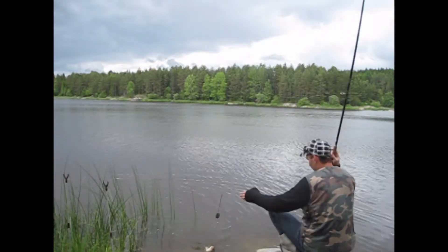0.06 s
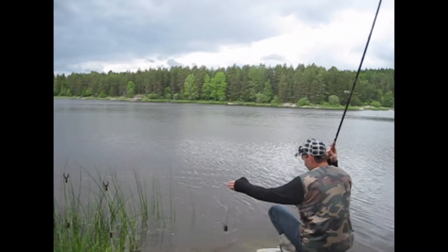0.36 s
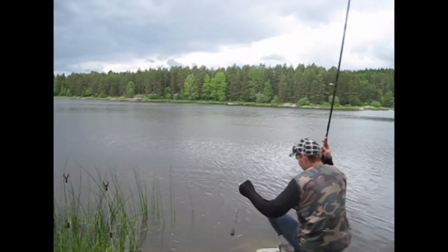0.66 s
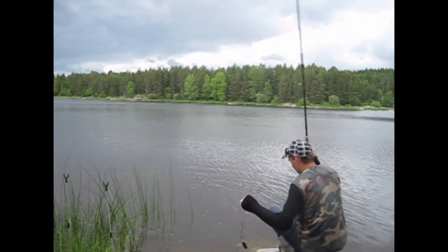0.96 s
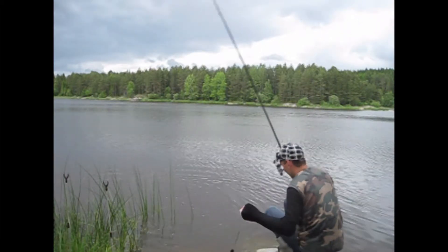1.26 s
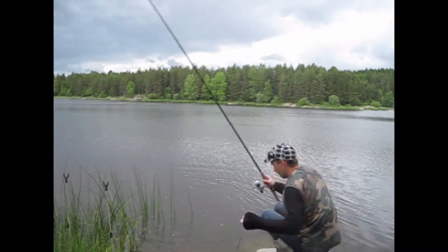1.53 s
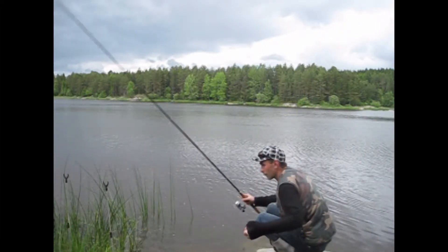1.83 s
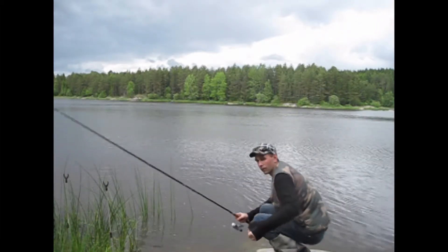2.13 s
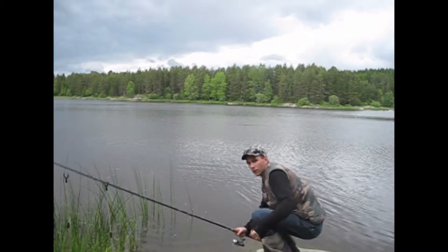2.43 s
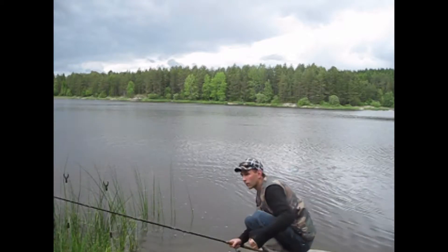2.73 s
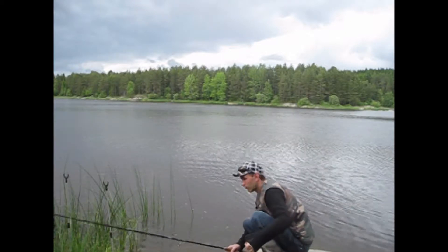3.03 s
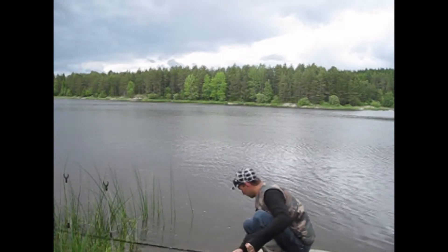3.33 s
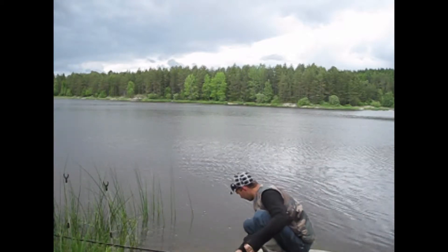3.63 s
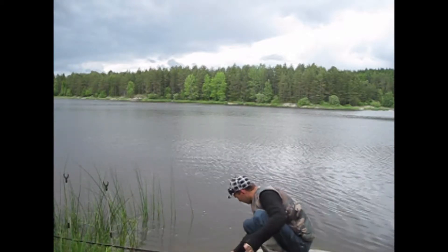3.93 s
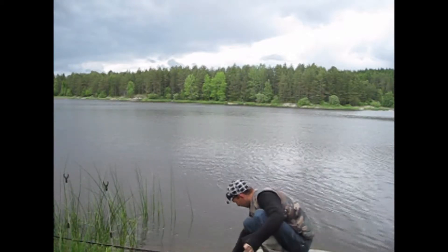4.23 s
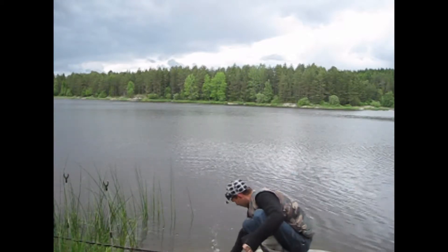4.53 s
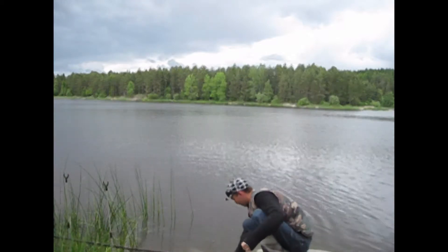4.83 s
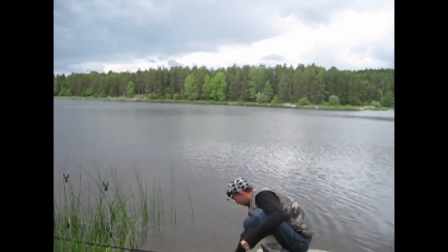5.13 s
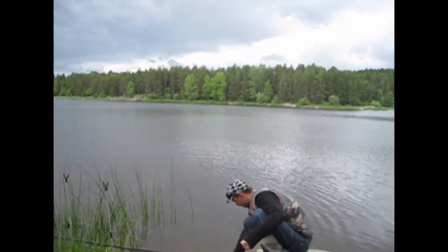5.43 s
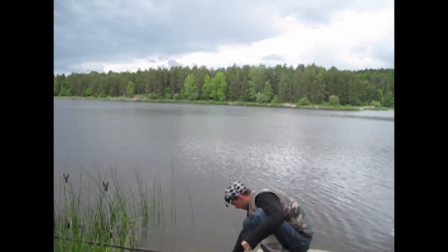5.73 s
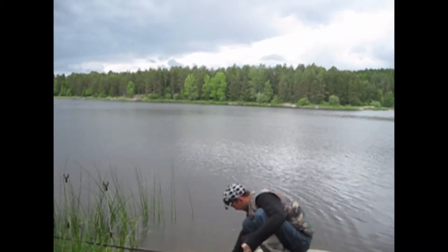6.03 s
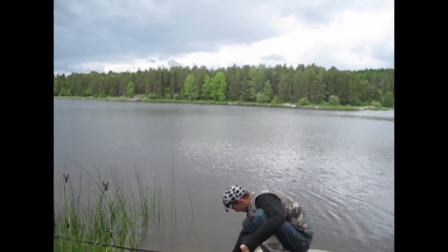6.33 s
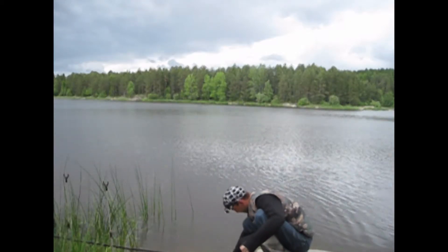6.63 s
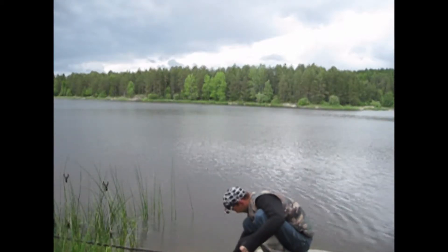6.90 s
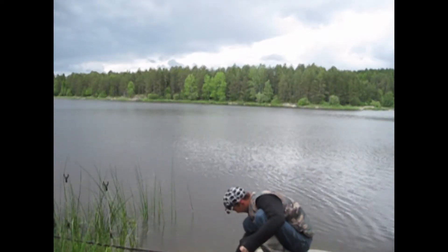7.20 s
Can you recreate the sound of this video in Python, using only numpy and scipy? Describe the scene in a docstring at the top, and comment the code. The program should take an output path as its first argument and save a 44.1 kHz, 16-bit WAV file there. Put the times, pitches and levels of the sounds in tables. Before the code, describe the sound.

On a quiet lake bank, water dribbles softly off a fishing line. Cloth rustles, a boot scuffs mud and stones, and a rod rattles as it is laid down. A small hooked fish then slaps and churns the shallows, the loudest moment, followed by metal tackle clinks, a brief wet squeak and a few drips. The action is close to the microphone, with a faint breeze and two distant songbirds behind.

```python
"""A small hooked fish slaps and churns the shallows: tail smacks, ringing air bubbles, fizzing spray.
On the quiet lake bank, water dribbles off the angler's line, cloth rustles and a boot scuffs mud and
stones. His rod rattles as it is laid down, metal tackle clinks and something wet sticks and slips in
a squeak. Behind it all, a light breeze in trees and reeds and two far songbirds."""
import sys
import numpy as np
from scipy import signal
from scipy.fft import rfft, irfft, next_fast_len
from scipy.io import wavfile
from scipy.ndimage import uniform_filter1d

SR = 44100
rng = np.random.default_rng(int(sys.argv[2]) if len(sys.argv) > 2 else 0)


def inscribe(sig):
    """Save sig as 16-bit PCM at rate SR to the path in sys.argv[1].

    A 1-D sig is mono; a 2-D sig holds one channel per row.
    Samples are clipped to [-1, 1] before scaling.
    """
    pcm = np.round(np.clip(np.atleast_2d(sig).T, -1, 1) * 32767)
    wavfile.write(sys.argv[1], SR, pcm.astype(np.int16))


N = 324562
TIME = np.arange(N) / SR

# tone of scattered water: (frequency [Hz], level [dB])
SPRAY_SPECTRUM = [(240, -48), (400, -11), (745, 0), (1590, 0), (2830, -2), (3720, -1), (6820, -5.5),
                  (7930, -10), (10700, -16), (15000, -20)]
# bright tick of sand grains and stray drops: (frequency [Hz], level [dB])
TICK_SPECTRUM = [(1200, -1), (2500, 2.5), (4000, 5.5), (6500, 1.5), (9000, -6), (15000, -20)]


def from_db(db):
    """Decibels to gain."""
    return 10 ** (np.asarray(db) / 20)


def rms_one(x):
    """Scale to unit rms."""
    return x / np.sqrt(np.mean(x ** 2) + 1e-20)


def curves(rows):
    """Breakpoints (time, values...) to one automation curve per value."""
    times, *columns = np.transpose(rows)
    return [np.interp(TIME, np.sort(times), column) for column in columns]


def add(out, s, sound):
    """Mix a sound in at s seconds."""
    start = max(int(s * SR), 0)
    out[start:start + len(sound)] += sound[:N - start]


def colour(x, spectrum):
    """EQ a noise along (Hz, dB) points; rms 1."""
    hz, db = np.transpose(spectrum)
    size = next_fast_len(len(x))
    bins = np.maximum(np.fft.rfftfreq(size, 1 / SR), 1)
    gain = from_db(np.interp(np.log(bins), np.log(hz), db))
    return rms_one(irfft(rfft(x, size) * gain, size)[:len(x)])


def cut(x, hz, kind, order=2):
    """Butterworth low- or high-pass."""
    return signal.sosfilt(signal.butter(order, min(hz, .45 * SR), kind, fs=SR, output="sos"), x)


def band(x, low_hz, high_hz):
    """Roll off both lows and highs."""
    return cut(cut(x, low_hz, "high"), high_hz, "low")


def split(x, hz):
    """Bass and treble parts that sum to the whole."""
    low = cut(x, hz, "low", order=1)
    return low, x - low


def resonate(x, hz, width_hz):
    """A resonance with gain 1 at its peak."""
    radius = np.exp(-np.pi * width_hz / SR)
    feedback = [1, -2 * radius * np.cos(2 * np.pi * hz / SR), radius ** 2]
    return signal.lfilter(np.array([1, 0, -1]) * (1 - radius ** 2) / 2, feedback, x + 1e-18)


def drift(per_s, size=N):
    """A random wander, gliding between values of spread 1."""
    knots = rng.standard_normal(size // 8 + 2)
    return np.interp(TIME[:size] * per_s, np.arange(len(knots)), knots)


def swell(s, db, rise_s, fade_s):
    """Power of a gesture that builds to its peak at s and dies away."""
    from_peak = np.maximum((s - TIME) / rise_s, (TIME - s) / fade_s)
    return from_db(db) ** 2 * np.exp(-2 * np.minimum(from_peak, 20))


def grains(per_s, spread_db):
    """Random clicks of very uneven size."""
    sizes = from_db(spread_db * np.minimum(rng.exponential(1, N), 4)) * rng.choice([-1, 1], N)
    return sizes * (rng.random(N) < per_s / SR)


def gurgle(per_s, low_hz, high_hz, cycles):
    """Random bubbles over a range of pitch, all ringing for the same count of cycles; rms 1."""
    births = grains(per_s, spread_db=2)
    pitches = np.geomspace(low_hz, high_hz, 24)
    voice = rng.integers(0, len(pitches), N)
    rings = (resonate(births * (voice == k), hz, hz / cycles) / np.sqrt(hz)
             for k, hz in enumerate(pitches))
    return rms_one(sum(rings))


def snaps(hits, crack_s=0.0011, puff_s=0.011, puff_db=-29):
    """A damped pressure pulse, a bright crack and a short puff; sharp hits crack more and ring less."""
    out, t = np.zeros(N), TIME[:SR // 25]
    for s, db, hz, sharpness in hits:
        crack_db = np.interp(sharpness, [0, 1], [-18, 1])
        damping = np.interp(sharpness, [0, 1], [0.098, 0.99])
        pulse = np.sin(2 * np.pi * hz * t) * np.exp(-np.pi * damping * hz * t)
        crack = band(rng.standard_normal(len(t)), 1800, 8500) * np.exp(-t / crack_s) / 2
        puff = band(rng.standard_normal(len(t)), 450, 5300) * np.exp(-t / puff_s)
        hit = cut(pulse, 1010, "high") + from_db(crack_db) * crack + from_db(puff_db) * puff
        add(out, s, from_db(db) * hit / np.abs(hit).max())
    return out


def breeze(waver_db=1.3, trees_trim_db=-0.2, reeds_trim_db=-0.62):
    """A soft, even rush of far trees and near reeds."""
    # tone of the moving air: (frequency [Hz], level [dB])
    air_spectrum = [(13, -12), (22, -2.5), (160, -3.5), (189, -4), (217, -3), (376, -3), (524, -3),
                    (690, -2.5), (1200, -5.5), (1410, -7.5), (2980, -7), (6620, -14.5), (7810, -20),
                    (9220, -15), (16000, -26)]
    # slow swells before and after the splash: (time [s], trees [dB], reeds [dB])
    swells_before = [(0.0, -58, -60), (1.59, -57.5, -59), (3.48, -56.5, -60), (4.1, -58, -60.5)]
    swells_after = [(5.4, -57.5, -61), (5.72, -57, -59.5), (7.36, -57, -59.5)]
    trees_db, reeds_db = curves(swells_before + swells_after)
    trees = rms_one(cut(colour(rng.standard_normal(N), air_spectrum), 2180, "low", order=4))
    reeds = rms_one(cut(colour(rng.standard_normal(N), air_spectrum), 2500, "high", order=4))
    trees *= from_db(trees_db + trees_trim_db + waver_db * drift(22))
    reeds *= from_db(reeds_db + reeds_trim_db)
    return trees + reeds


def whistle(hz, db, waver=0.013):
    """One soft-edged, slightly unsteady bird note along a pitch line."""
    phase = 2 * np.pi * np.cumsum(hz * (1 + waver * drift(345, size=len(hz)))) / SR
    envelope = np.sqrt(np.abs(np.sin(np.linspace(0, np.pi, len(hz)))))
    return from_db(db) * envelope * np.sin(phase)


def birds(note_s=0.057, sag=0.022, chirp_s=0.055, direct_db=-5, echo_db=-8, forest_t60_s=0.63):
    """One far bird whistles a falling phrase, another repeats an arched chirp; the trees smear both."""
    # the whistled phrase: (time [s], pitch [Hz], level [dB])
    phrase = [(.33, 4100, -56), (1.055, 4110, -51.5), (1.23, 4140, -51.5), (1.37, 3690, -51.5),
              (1.535, 3700, -50.5), (1.695, 3630, -50), (1.865, 3620, -59)]
    song = np.zeros(N)
    droop = 1 - sag * np.linspace(-.5, .5, int(note_s * SR))
    for s, hz, db in phrase:
        add(song, s, whistle(hz * droop, db))
    arch = np.sin(np.linspace(0, np.pi, int(chirp_s * SR))) ** 2
    chirp_hz = np.interp(arch, [0, 1], [2900, 4170])
    for k in range(4):
        add(song, 6.622 + k * 0.14, whistle(chirp_hz, db=-51, waver=.05))
    forest = rng.standard_normal(SR) * from_db(-60 * TIME[:SR] / forest_t60_s)
    echo = signal.fftconvolve(song, forest / np.linalg.norm(forest))[:N]
    return from_db(direct_db) * song + from_db(echo_db) * echo


def bank_echo(x, echo_db=-28, t60_s=0.2):
    """Ground, reeds and the crouching body add a faint, dull echo."""
    t = TIME[:SR // 2]
    scatter = cut(rng.standard_normal(len(t)), 3000, "low") * from_db(-60 * t / t60_s)
    return x + from_db(echo_db) * signal.fftconvolve(x, scatter / np.linalg.norm(scatter))[:N]


def low_thumps(top_hz=95):
    """Dull low thumps, the loudest being the thud of the big splash."""
    # (time [s], level [dB], half-width [s])
    thumps = [(3.56, -63, .03), (4.03, -49, 0.018), (4.424, -38, 0.009), (5.43, -55, 0.025)]
    envelope = sum(from_db(db) * np.exp(-((TIME - s) / width_s) ** 2) for s, db, width_s in thumps)
    return envelope * rms_one(cut(rng.standard_normal(N), top_hz, "low")) / 2


def trickle(plink_db=-1, patter_db=-3):
    """Water dribbles off the lifted line: small plinks and a soft patter that build, then stop."""
    plinks = from_db(plink_db) * gurgle(per_s=50, low_hz=1100, high_hz=2830, cycles=33)
    patter = from_db(patter_db) * colour(grains(220, spread_db=6), SPRAY_SPECTRUM)
    return np.sqrt(swell(s=0.92, db=-61, rise_s=1.6, fade_s=0.039)) * (plinks + patter)


def rustle_and_thud(lumpy_db=0.5):
    """A low, grainy rustle of cloth, then a short, dull boot thud."""
    # (time [s], level [dB], rise [s], fade [s])
    gestures = [(1.16, -47, 0.021, 0.089), (1.569, -43, 0.0048, 0.0098)]
    # dull tone of both: (frequency [Hz], level [dB])
    dull_spectrum = [(60, -18), (150, -6), (230, -5), (400, 0), (650, -9), (1500, -9), (4000, -36)]
    envelope = np.sqrt(sum(swell(*gesture) for gesture in gestures)) * from_db(lumpy_db * drift(90))
    return envelope * colour(grains(1300, spread_db=4.5), dull_spectrum)


def boots(lumpy_db=3, squelch_db=-3, rub_db=-3):
    """A sole shifts on the wet bank: a lumpy rub and squelch of mud under an evener crackle of sand."""
    # shifts of the boot: (time [s], scuff [dB], grit [dB], rise [s], fade [s])
    shifts = [(1.17, -54.5, -61, 0.09, 0.18), (1.74, -58, -58.5, 0.27, .25), (2.275, -43, -47, 0.02, 0.052),
              (2.353, -33.5, -43, 0.015, 0.032), (2.384, -36, -42, 0.0061, 0.024),
              (2.53, -55, -58, 0.18, 0.075)]
    # dull tone of the rubbing sole: (frequency [Hz], level [dB])
    sole_spectrum = [(41, -53), (70, -16), (207, -9), (310, -39), (458, -50), (591, 1.5), (712, -4.5),
                     (1270, -2.5), (1450, -11), (1580, -3.5), (3160, -18), (4000, -24), (5200, -50),
                     (8800, -120)]
    scuffing = np.sqrt(sum(swell(s, db, rise_s, fade_s) for s, db, _, rise_s, fade_s in shifts))
    grinding = np.sqrt(sum(swell(s, db, rise_s, fade_s) for s, _, db, rise_s, fade_s in shifts))
    rub = from_db(rub_db) * colour(grains(12000, spread_db=4), sole_spectrum)
    squelch = from_db(squelch_db) * gurgle(per_s=600, low_hz=225, high_hz=1500, cycles=10.6)
    grit = colour(grains(7000, spread_db=3), TICK_SPECTRUM)
    return scuffing * from_db(lumpy_db * drift(140)) * (rub + squelch) + grinding * grit


def stones():
    """Stones crack under the boot."""
    # (time [s], peak [dB], pitch [Hz], sharpness [0-1])
    cracks = [(2.2925, -28, 1840, 0.7), (2.3808, -28, 1550, 0.5), (2.4075, -28, 1400, 0.7),
              (2.42, -17, 1500, 0.71)]
    return snaps(cracks)


def squeak(start_s=5.697, end_s=5.787, jitter=0.0204, slips_per_s=340, rasp_db=-18, overtone_db=-30):
    """Wet surfaces stick and slip: rough gliding partials, pulsed by the slips, with a thin rasp."""
    # the low gliding tone: (time [s], pitch [Hz], level [dB])
    low_glide = [(5.70, 1780, -39), (5.715, 1725, -38), (5.728, 1425, -29.5), (5.75, 1280, -22.5),
                 (5.763, 1380, -33.5), (5.77, 1870, -37), (5.784, 2340, -58)]
    # the rub that bends and swells all shrill partials: (time [s], pitch [ratio], level [dB])
    rubbing = [(5.698, 0.95, -30), (5.705, 1.02, -19), (5.714, 0.94, -23), (5.721, 1.06, -18.5),
               (5.738, 1.03, -27.5), (5.765, .995, -27.5), (5.785, 0.96, -31.5)]
    # shrill partials: (pitch [Hz], level [dB], strongest at [s], spread [s])
    partials = [(3063, -7, 5.785, 0.053), (3680, -1, 5.73, .2), (4280, -5.5, 5.707, 0.014),
                (5260, -4.5, 5.745, 0.04)]
    # tone of the rasp: (frequency [Hz], level [dB])
    rasp_spectrum = [(450, -18), (700, -7.5), (1050, 1), (1500, 1), (2400, -8), (4200, -24),
                     (6200, 1.5), (9000, -11), (11000, -22), (14000, -34)]
    bend, rub_db = curves(rubbing)
    shrill = [(hz * bend, rub_db + db - 10 * np.minimum(((TIME - s) / spread_s) ** 2, 2))
              for hz, db, s, spread_s in partials]
    rough = np.clip((TIME - start_s) / 0.022, .25, 1)   # starts clean, then breaks up
    slip = np.sin(2 * np.pi * np.cumsum(slips_per_s * (1 + 0.22 * rough * drift(300))) / SR)
    tone = np.zeros(N)
    for hz, db in [curves(low_glide)] + shrill:
        phase = 2 * np.pi * np.cumsum(hz + jitter * rough * (hz + 1500) * drift(900)) / SR
        flutter_db = 1.3 * rough * drift(500)
        pulsing = 1 + 0.5 * slip * np.minimum(hz / 3700, 1)   # slips chop the high partials most
        wave = np.sin(phase) + from_db(overtone_db) * np.sin(2 * phase)
        tone += from_db(db + flutter_db) * pulsing * wave
    tone_rms = np.sqrt(np.abs(uniform_filter1d(tone ** 2, size=200)))
    rasp = from_db(rasp_db) * rough * tone_rms * colour(rng.standard_normal(N), rasp_spectrum)
    gate = np.clip((TIME - start_s) / 0.0026, 0, 1) * np.clip((end_s - TIME) / 0.00089, 0, 1)
    return gate * (tone + rasp)


def tackle(tick_db=-8, tick_s=0.0011, jingle_db=-32, jingle_s=0.026, attack_s=0.00016):
    """Small metal parts clink: a tick, a bright jingle and ringing modes that chatter in loose contact."""
    # (time [s], peak [dB], treble tilt [dB/octave], ring length [ratio])
    clinks = [(2.6977, -30, 2, 0.92), (4.8026, -22.5, 15, 0.85), (4.8233, -32, 16, 0.85),
              (4.9692, -16, 1.5, 0.51), (5.0358, -26, -1, 0.73), (5.05, -40, 1, 0.93)]
    # modes of the metal: (frequency [Hz], level [dB], t60 [s])
    modes = [(710, -30, 0.21), (1190, -21, 0.2), (1560, -12, 0.049), (2490, -7.5, 0.019),
             (2820, -6.5, 0.026), (3343, -35, .1), (3810, -1, 0.092), (3910, -31, 0.41),
             (4200, -5.5, 0.027), (5100, -7.5, 0.039), (5750, -4.5, 0.0077), (6410, -19.5, 0.069),
             (7130, -28, .07), (8300, -21.5, 0.049), (9180, -36, 0.14), (11100, -37, 0.16)]
    out, t = np.zeros(N), TIME[:SR // 4]
    hz, mode_db, t60 = np.transpose(modes)[:, :, None]
    for s, db, tilt_db, ring_length in clinks:
        strength = from_db(mode_db + tilt_db * np.log2(hz / 3800) + .5 * rng.standard_normal(hz.shape))
        chatter = 1 + np.minimum(t / 0.0077, 1) * np.array([drift(307, size=len(t)) for _ in modes])
        decay = from_db(-60 * t / (t60 * ring_length))   # fingers damp some clinks sooner
        waves = np.sin(2 * np.pi * (hz * t + rng.random(hz.shape)))
        ring = (strength * chatter * decay * waves).sum(0)
        tick = band(rng.standard_normal(len(t)), 1100, 3900) * np.exp(-t / tick_s)
        jingle = cut(rng.standard_normal(len(t)), 3500, "high") * np.exp(-t / (jingle_s * ring_length))
        hit = ring + from_db(jingle_db + tilt_db) * jingle + from_db(tick_db) * tick
        hit *= 1 - np.exp(-t / attack_s)
        add(out, s, from_db(db) * hit / np.abs(hit).max())
    return out


def rod(tick_db=15, longest_t60_s=0.092, treble_life=0.61, hold_s=0.00091, body_db=-10, trim_db=-5):
    """Rod and reel knock on the bank: ticks and dense rattles, treble dying first, ring the body."""
    # (time [s], level [dB], treble [dB])
    knocks = [(3.014, -46.5, -25), (3.105, -40.5, -6), (3.1214, -36, 5), (3.171, -35.5, 4),
              (3.213, -33.5, 6.5), (3.2296, -30, 4), (3.282, -31.5, -2.5), (3.33, -25.5, 4),
              (3.375, -30.5, 5.5), (3.4378, -32.5, -17), (3.4534, -30, 5), (3.497, -40, -5),
              (3.5192, -37, -5), (3.8416, -41.5, -19), (3.931, -43, -22)]
    # tone of the rattle: (frequency [Hz], level [dB])
    rattle_spectrum = [(290, -48), (500, -40), (694, -9), (835, -9), (909, -11), (1080, -37), (1630, -0.5),
                       (1930, -8), (2800, -1), (3460, -6.5), (6300, -9.5), (7470, -21), (7910, -21),
                       (8990, -21.5), (15000, -42)]
    # body of rod and reel: (frequency [Hz], width [Hz], level [dB])
    resonances = [(1080, 99, -11), (1550, 170, -6), (2390, 110, 10.5), (2770, 460, 3.5), (3700, 140, 0),
                  (4300, 130, 1), (6360, 110, -6), (7250, 260, 5)]
    hits, t = np.zeros(N), TIME[:SR // 8]
    hardest_db = max(db for _, db, _ in knocks)
    for s, db, treble_db in knocks:
        force_db = db - hardest_db
        t60 = longest_t60_s * 2 ** (force_db / 21)   # softer knocks settle sooner
        contact = rng.standard_normal(len(t))
        contact[8] += from_db(tick_db)
        low, high = split(colour(contact, rattle_spectrum), 3600)
        decay_db = -60 * np.maximum(t - hold_s, 0) / t60   # loose parts chatter before settling
        rattle = low * from_db(decay_db) + high * from_db(treble_db + decay_db / treble_life)
        hollow = rms_one(resonate(resonate(contact, 1170, 700), 1170, 700))
        thud = hollow * from_db(force_db - 1 - 60 * t / 0.09)   # only hard knocks wake the hollow butt
        add(hits, s, from_db(db) * (rattle + thud))
    body = sum(from_db(db) * resonate(hits, hz, width_hz) for hz, width_hz, db in resonances)
    return from_db(trim_db) * (hits + from_db(body_db) * body)


def spatter(peak_s=5.14, spread_s=0.2, db=-59.5):
    """Thrown drops rain back as lone bright ticks, swelling and fading after the splash."""
    shower = np.exp(-((TIME - peak_s) / spread_s) ** 2 / 2)
    return from_db(db) * shower * colour(grains(per_s=70, spread_db=2.5), TICK_SPECTRUM)


def bubbles(cycles_per_life=4.526, octaves_per_life=0.026, trim_db=2):
    """Trapped air swells, rings down and rises in pitch near the surface; big bubbles ring longest."""
    # larger bubbles from the fish, the boot and drips: (time [s], level [dB], pitch [Hz])
    plops = [(0.228, -41, 1500), (0.412, -47, 1380), (0.613, -38, 3630), (0.915, -46.5, 636),
             (1.013, -43.5, 1550), (2.382, -30, 1550), (2.422, -26, 1440), (4.255, -22.5, 1042),
             (4.327, -28, 1430), (4.339, -24, 3370), (4.377, -35, 3050), (4.432, -12, 1340),
             (4.474, -25, 3070), (4.486, -27.5, 1130), (4.506, -34, 2250), (4.531, -26.5, 3400),
             (4.542, -23.5, 3780), (4.569, -34.5, 1870), (4.613, -30, 1560), (4.691, -32.5, 557),
             (4.707, -39.5, 850), (4.768, -32, 5160), (5.098, -39, 1470), (5.128, -32.5, 1080),
             (5.144, -36.5, 1120), (6.936, -35, 1500), (6.961, -39, 2240)]
    out = np.zeros(N)
    for s, db, hz in plops:
        life_s = cycles_per_life / hz
        age = np.arange(-2 * life_s, 10 * life_s, 1 / SR) / life_s   # in lives, 0 at the peak
        envelope = np.where(age < 0, np.exp(-(age / 0.19) ** 2 / 2), np.exp(-np.abs(age) / 0.65))
        rising_hz = hz * 2 ** (octaves_per_life * np.clip(age, -1, 2))
        phase = 2 * np.pi * np.cumsum(rising_hz) / SR
        add(out, s - 2 * life_s, from_db(db + trim_db) * envelope * np.sin(phase))
    return out


def spray(cycles=11, mist_db=-9, gurgle_db=-5, wash_db=-22, wash_fade_s=0.36):
    """The fish tears the water: tiny short-lived bubbles over a fine mist, then a gurgling wash."""
    # strokes of the fish: (time [s], level [dB], rise [s], fade [s], treble over bass [dB])
    strokes = [(4.254, -41.5, 0.01, 0.018, -8), (4.334, -32, 0.0075, .006, 8.5),
               (4.433, -39.5, 0.0017, 0.047, 12), (4.488, -41.5, 0.018, 0.013, -11.5),
               (4.547, -40, 0.02, 0.023, 17.5), (4.616, -36, 0.01, 0.0087, 2),
               (4.68, -42.5, 0.015, 0.019, 4), (4.86, -49, 0.067, 0.051, 3), (5.06, -51, .015, 0.065, 3),
               (5.138, -46, 0.019, .016, -5), (6.962, -49, 0.0079, 0.026, -2)]
    drops = grains(per_s=2400, spread_db=3.5)
    pitches = np.geomspace(800, 13000, 36)
    voice = rng.integers(0, len(pitches), N)
    fizz = rms_one(sum(resonate(drops * (voice == k), hz, hz / cycles) for k, hz in enumerate(pitches)))
    mist = from_db(mist_db) * rng.standard_normal(N)
    low, high = split(colour(fizz + mist, SPRAY_SPECTRUM), 5300)
    low += from_db(gurgle_db) * gurgle(per_s=160, low_hz=922, high_hz=4150, cycles=31)
    low_power, high_power = np.zeros((2, N))
    for s, db, rise_s, fade_s, bright_db in strokes:
        wash = swell(s, db + wash_db, rise_s, wash_fade_s)   # drops keep falling back
        power = swell(s, db, rise_s, fade_s) + wash
        low_power += power * from_db(-bright_db)
        high_power += power * from_db(bright_db)
    return low * np.sqrt(low_power) + high * np.sqrt(high_power)


def slaps():
    """The fish's tail and falling drops smack the surface."""
    # (time [s], peak [dB], pitch [Hz], sharpness [0-1])
    smacks = [(0.544, -35.5, 5770, 0.13), (0.602, -33, 4300, 0.08), (0.704, -27, 2450, 0.3),
              (.779, -39.5, 2600, 0.7), (.865, -29, 3980, 0.2), (.879, -40, 2400, 0.4),
              (4.249, -27, 2300, .4), (4.294, -23, 1380, 0.67), (4.329, -18, 2340, 0.37),
              (4.4312, -2, 2230, 0.54), (4.688, -15.5, 5760, 0.12), (4.909, -30, 2510, 0.6),
              (4.912, -28.5, 2000, .95), (5.072, -31, 6000, .7), (5.128, -28, 5630, 0.8),
              (5.156, -33.5, 5000, 1), (6.6925, -27, 3400, 0.08), (6.935, -32.5, 1100, .3),
              (6.952, -29.5, 2900, 0.34), (6.962, -33, 5300, 0), (7.032, -34.5, 4500, 0.4),
              (7.159, -36.5, 1100, 0.35)]
    return snaps(smacks)


def scene():
    """Close water and angler foley over the far birds and breeze, in mono."""
    water = bubbles() + slaps() + spray() + spatter() + trickle()
    angler = rod() + tackle() + squeak() + boots() + stones() + rustle_and_thud()
    return (bank_echo(water + angler) + birds() + breeze() + low_thumps())[None]


def record(dry, notch_hz=7900, notch_width_hz=900, cutoff_hz=16000):
    """The microphone has a deep notch in the treble and a steep top cut."""
    notched = signal.lfilter(*signal.iirnotch(notch_hz, notch_hz / notch_width_hz, fs=SR), dry)
    return signal.sosfilt(signal.ellip(10, .1, 70, cutoff_hz, fs=SR, output="sos"), notched)


dry = scene()
out = record(dry)
inscribe(out)
```